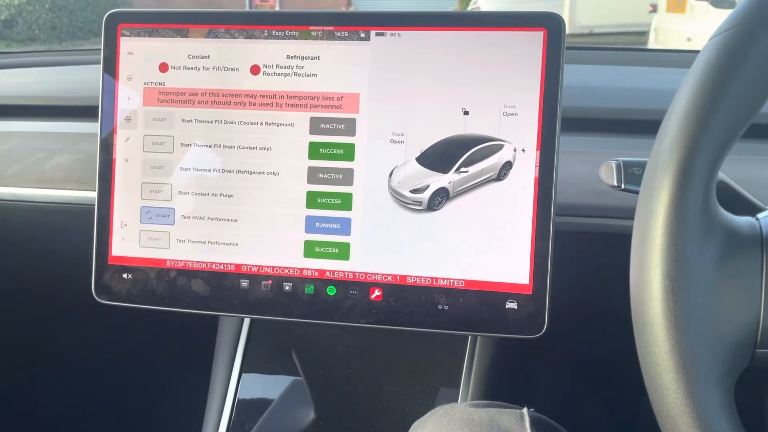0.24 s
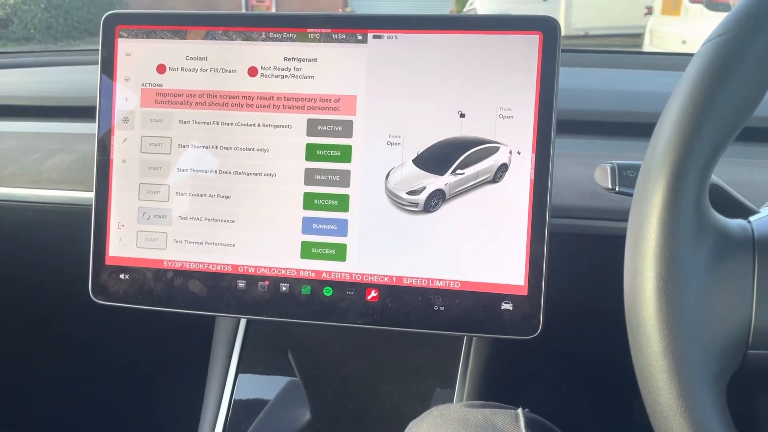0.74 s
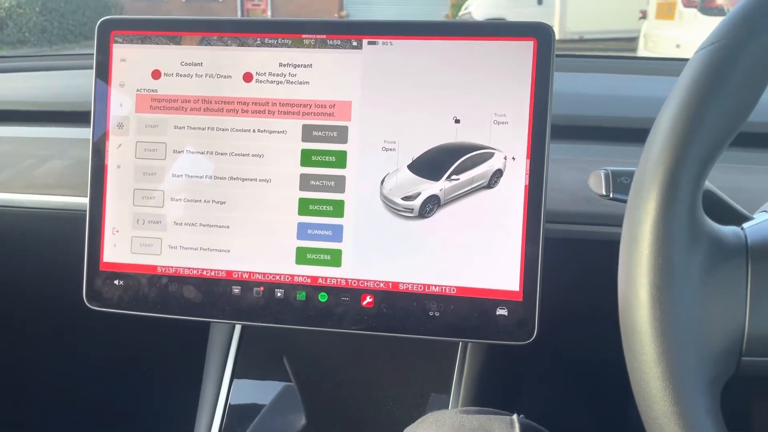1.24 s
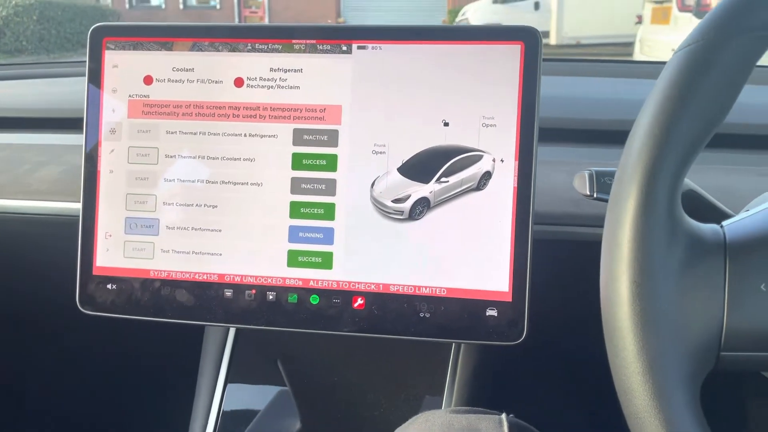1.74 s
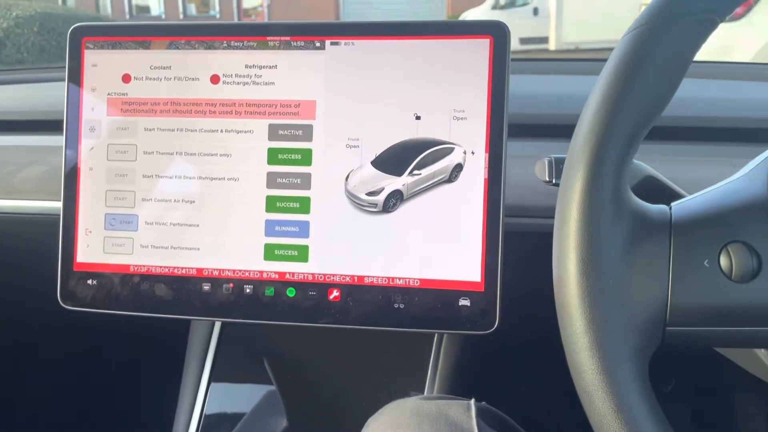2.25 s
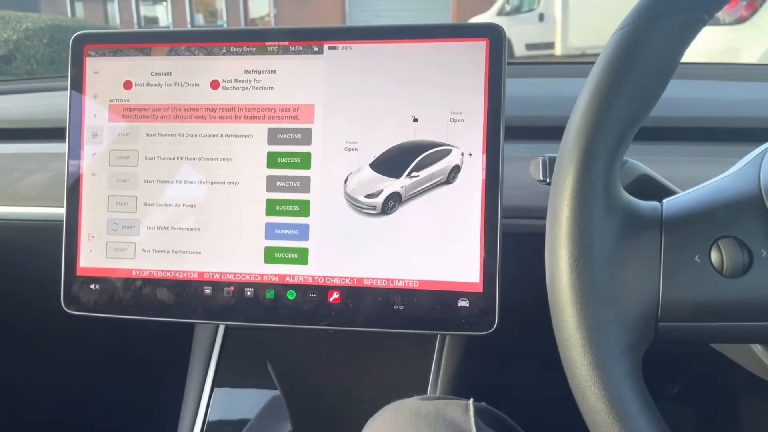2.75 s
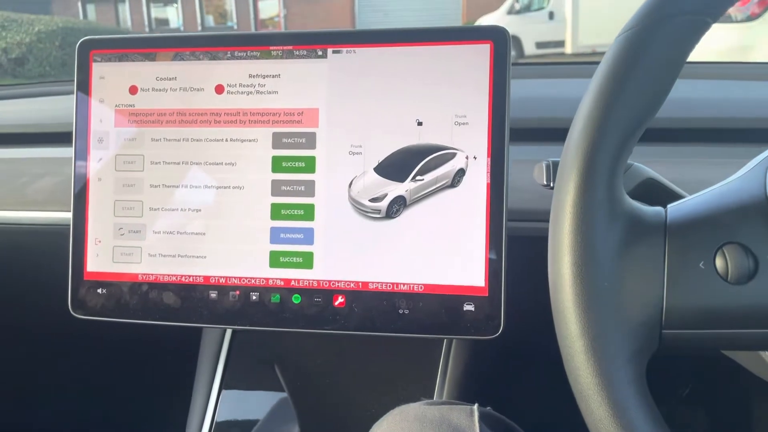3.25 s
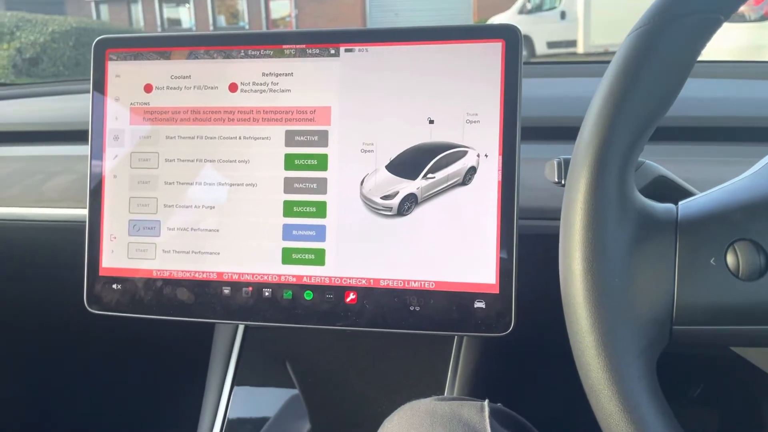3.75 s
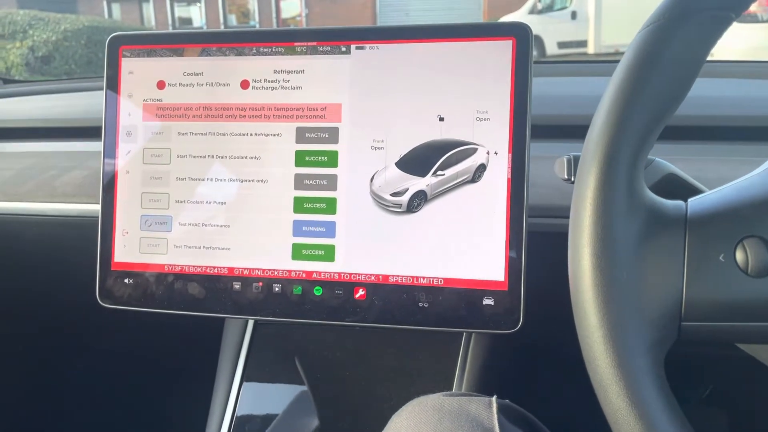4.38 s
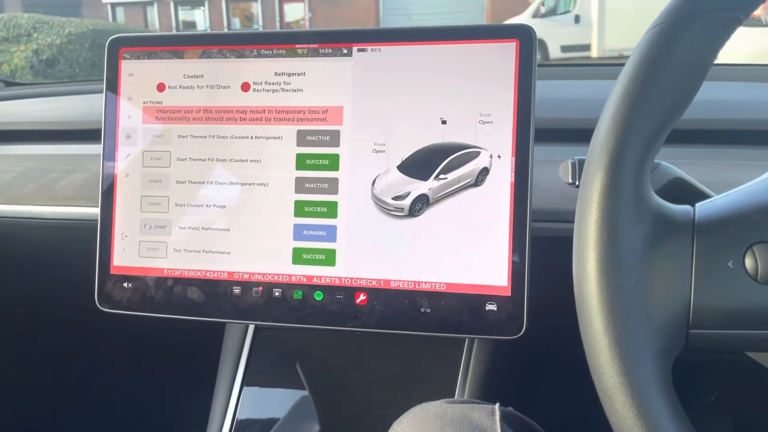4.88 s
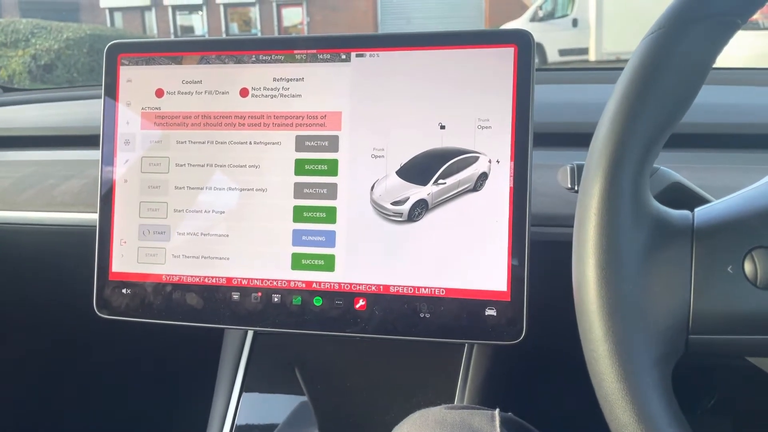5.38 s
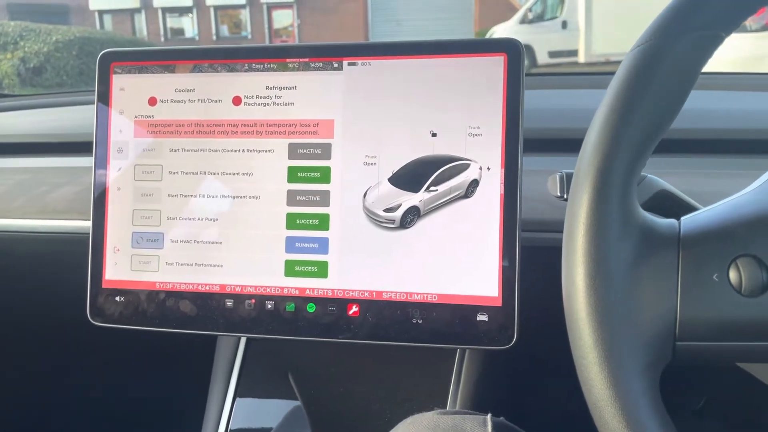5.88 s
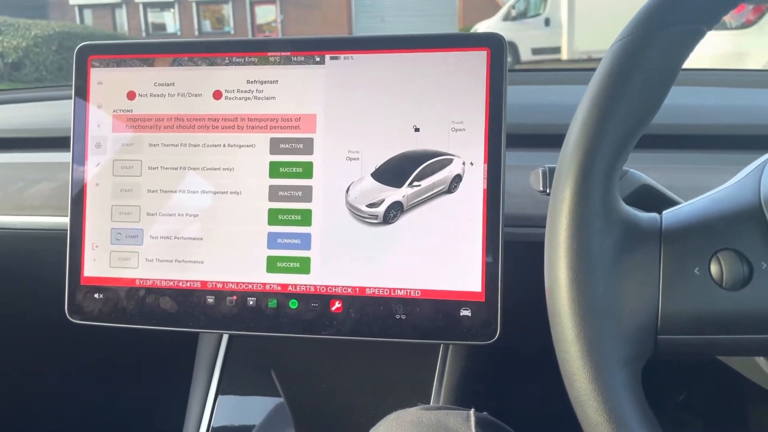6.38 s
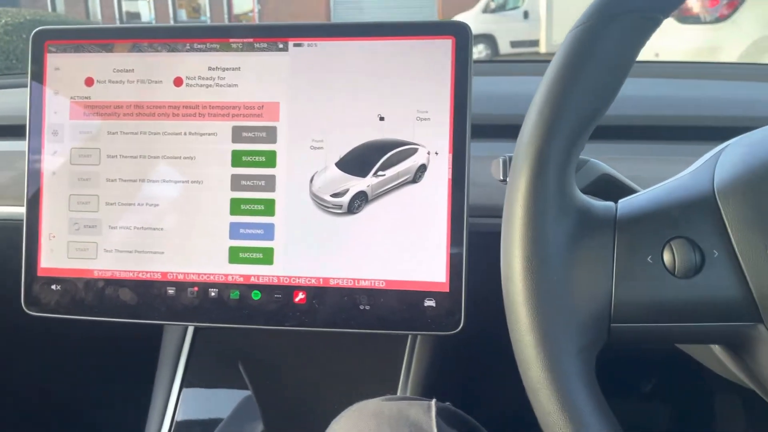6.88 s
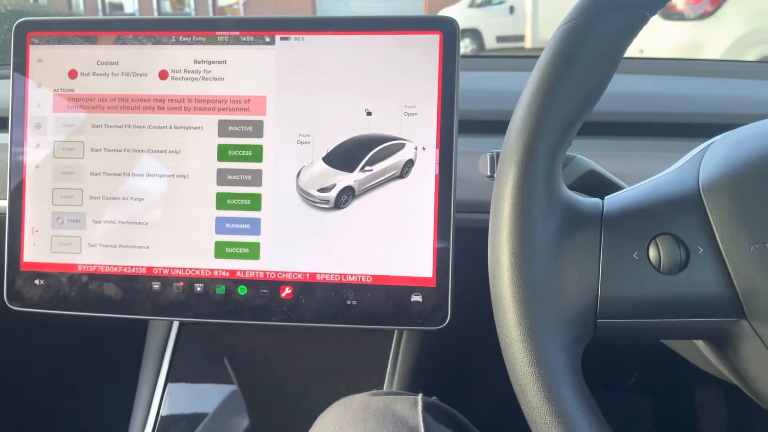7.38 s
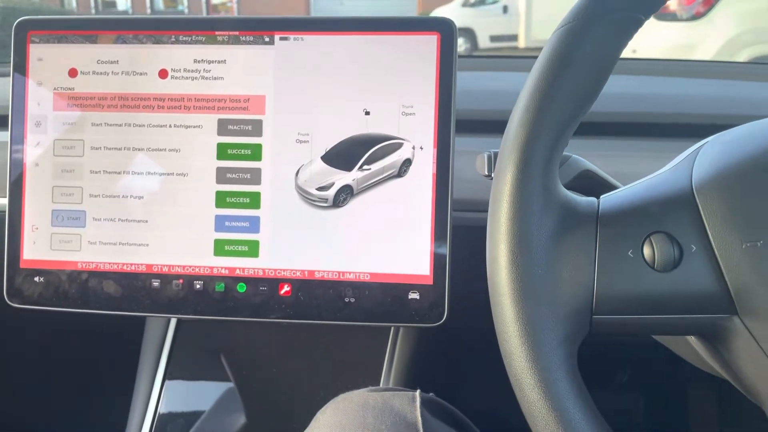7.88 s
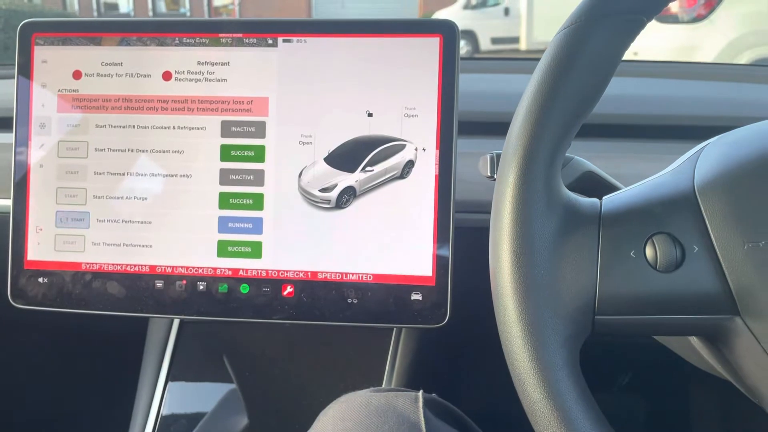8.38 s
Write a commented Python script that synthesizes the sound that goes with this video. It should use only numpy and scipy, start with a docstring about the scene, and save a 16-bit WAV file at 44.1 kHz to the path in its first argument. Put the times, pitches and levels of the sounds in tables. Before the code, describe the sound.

Inside a closed parked car, a climate fan blows steadily through dashboard vents, boomy and hissing, with a low motor whine rising late.

```python
"""In a parked car with the cabin closed, a climate fan blows through the dashboard vents, close to a
handheld pair of microphone ports. The cabin booms, the ducts roar and the vent slats hiss: noise shaped
by spectra and level curves. A fuzzy low hum near 60 Hz, like a cabin resonance, is a sine of random pitch
that swells unevenly; late on a motor, likely the coolant compressor, spins up as a rising tone with an
octave. The right port is muffled for a while."""
import sys
import numpy as np
from scipy import signal
from scipy.io import wavfile
from scipy.ndimage import uniform_filter1d

SR = 44100
rng = np.random.default_rng(int(sys.argv[2]) if len(sys.argv) > 2 else 0)


def store_pcm(level_fs):
    """Save levels as 16-bit WAV."""
    pcm = np.round(np.clip(level_fs, -1, 1) * 32767).astype(np.int16)
    wavfile.write(sys.argv[1], SR, np.atleast_2d(pcm).T)


N = 380583
FRAME, HOP = 4096, 1024  # samples, for shaping noise in the spectrum
FRAMES = N // HOP + 5
BIN_HZ = np.fft.rfftfreq(FRAME, 1 / SR)


def gain_of(db):
    """Decibels to amplitude."""
    return 10 ** (np.asarray(db) / 20)


def evened(x):
    """Scales to rms 1."""
    return x / np.sqrt(np.mean(x ** 2) + 1e-20)


def read(points, hz, axis=1):
    """One column of a table over log frequency."""
    table = np.transpose(points)
    return np.interp(np.log(hz + 1), np.log(table[0] + 1), table[axis])


def curve(rows, axis=1):
    """One column of a table over time, sample by sample."""
    table = np.transpose(rows)
    return np.interp(np.arange(N) / SR, table[0], table[axis])


def smoothed(x, first, second):
    """Averages noise over neighbouring bins, then over neighbouring frames."""
    return uniform_filter1d(uniform_filter1d(x, size=first, axis=0), size=second, axis=1)


def drift(seconds):
    """Slow random wandering, rms 1."""
    size = max(round(seconds * SR), 1)
    wander = uniform_filter1d(rng.standard_normal(N), size=size)
    return evened(uniform_filter1d(wander, size=size))


def compressor():
    """A rough shaft tone and its faint octave, climbing as the motor runs up."""
    # shaft tone of the motor: time_s, pitch_hz, level_db
    spin_up = [(5.4, 83, -46), (5.8, 90, -37), (6.1, 95, -33), (6.35, 99, -29), (6.6, 103, -31.5),
               (6.85, 107, -27), (7.03, 111, -34), (7.2, 114, -29), (7.45, 118, -31), (7.75, 123, -28),
               (8.1, 129.5, -33), (8.23, 132, -29), (8.35, 133.5, -35), (8.63, 136, -31)]
    start_s, waver_hz, octave_db, restless_db = 5.4, 2.2, -15, 2.6
    pitch_hz = curve(spin_up) + waver_hz * drift(0.029)
    phase = 2 * np.pi * np.cumsum(pitch_hz) / SR
    since_s = np.maximum(np.arange(N) / SR - start_s, 0)
    fade_in = np.minimum(10 * since_s, 1)  # over 0.1 s
    tone = np.sqrt(2) * (np.sin(phase) + gain_of(octave_db) * np.sin(2 * phase)) * fade_in
    restless = evened(gain_of(restless_db * drift(0.03)))
    port_db = np.array([[-1.5], [1.5]])  # left, right
    return gain_of(curve(spin_up, axis=2) + port_db) * restless * tone


def hum():
    """A fuzzy low hum near 60 Hz whose pitch wanders at random; it swells and fades."""
    # level of the hum: time_s, level_db
    hum_level = [(0, -41), (.48, -27), (.55, -34), (1.33, -35), (1.42, -26), (1.52, -38), (1.9, -30),
                 (2.04, -38), (2.19, -28), (2.31, -44), (2.4, -26), (2.46, -38), (2.53, -24), (2.63, -38),
                 (2.87, -25), (2.95, -42), (3.3, -34), (3.6, -35), (4.0, -29), (4.4, -32), (4.48, -39),
                 (4.81, -27), (5.2, -33), (5.5, -23), (5.58, -47), (5.77, -28), (5.85, -40), (6.42, -26),
                 (6.66, -39), (6.8, -29), (7.43, -25.5), (7.52, -34), (7.92, -26.5), (8.02, -39),
                 (8.55, -30), (8.63, -38)]
    center_hz, width_hz = 60, 8.32
    swell_s, steady = .05, 2.2  # time scale, and the steady part against a wavering part of rms 1
    wander = uniform_filter1d(uniform_filter1d(rng.standard_normal(N), size=2000), size=2000)
    turns = np.cumsum(center_hz + width_hz / 2 * evened(wander)) / SR
    swell = evened(np.hypot(steady + drift(swell_s), drift(swell_s)))
    tone = np.sqrt(2) * np.sin(2 * np.pi * turns) * swell
    port_db = np.array([[-.2], [.2]])  # left, right
    return gain_of(curve(hum_level) + port_db) * tone


def rings():
    """Lift of the resonances in dB by port, bin and frame, sliding in pitch as the handheld ports drift."""
    # narrow resonances of ducts and cabin: center_hz, width_hz, left_lift_db, right_lift_db
    resonances = [(225, 20, -3, -3), (430, 40, 2, 0), (540, 50, 1, 2.5), (635, 40, 2, 2), (690, 40, -3, 0),
                  (830, 40, 3, 2), (875, 25, -2, 0), (930, 50, 4, 1), (1060, 30, -1, -3), (1110, 40, 5, 3),
                  (1165, 30, -3, -1), (1190, 40, 0, 3), (1300, 50, 0, -3), (1340, 50, 2, 1),
                  (1400, 40, -2, -1.5), (1460, 50, 0, 2.5), (1530, 30, 3, 1), (1800, 90, -3.5, -.5),
                  (2070, 60, 2, 1.5), (2150, 50, 1.5, 1), (2300, 60, 1, 1), (4800, 200, 1.5, 1),
                  (5150, 200, 1.5, 1), (5600, 500, -1, -1), (6350, 300, 1, 1)]
    slide, slide_s = .008, .4  # rms share of pitch, and time scale
    still = np.zeros((2, len(BIN_HZ)))
    for center_hz, width_hz, left_db, right_db in resonances:
        peak = 1 / (1 + (2 * (BIN_HZ - center_hz) / width_hz) ** 2)
        still += np.array([[left_db], [right_db]]) * peak
    frame_at = np.minimum(np.arange(FRAMES) * HOP, N - 1)
    sliding = []
    for port_db in still:
        slid_hz = BIN_HZ[:, None] * (1 + slide * drift(slide_s)[frame_at])
        sliding.append(np.interp(slid_hz, BIN_HZ, port_db))
    return np.array(sliding)


def air(spectrum, rings_db, patchy_db, gusty_db, grainy_db):
    """Noise as both ports hear it, with spectral patches, light gusts and a fine random grain in narrow bands."""
    # the two ports: pitch_hz, likeness (0-1), left_lead_rad, left_minus_right_db
    low_ports = [(60, .945, -.15, -.5), (140, .925, -.1, -3), (210, .95, .2, -4), (350, .95, .2, -2.5),
                 (440, .75, .2, 0), (520, .45, 0, 0), (600, .8, .5, -.5), (760, .62, .8, 0),
                 (900, .55, 1, 2), (1100, .3, 1.6, 1), (1250, .3, 1.6, 1.5), (1450, .12, 0, 1.5),
                 (1650, .2, -1.5, .5), (1850, .45, -.6, 1), (2150, .75, 0, 1), (2400, .75, .45, 1),
                 (2700, .55, .9, 1), (3400, .42, 1.1, 1.5), (4200, .7, .1, 1), (4800, .75, 0, 1),
                 (5250, .55, -.1, 1), (5600, .15, -1.6, 1.5), (6500, .5, -2.6, 1)]
    # treble at the ports, flipping between opposite and equal phase: same columns
    treble_ports = [(6950, 1, -np.pi, 0), (8200, 1, -np.pi, 0), (8450, .75, -4, 0), (9400, .6, -4.9, 0),
                    (10200, 1, -2 * np.pi, 0), (12300, 1, -2 * np.pi, 0), (13100, 1, -3 * np.pi, 0)]
    # muffling of the right port, likely by the hand: time_s, amount (0-1)
    cover_curve = [(0, 0.08), (3.38, 0.11), (3.5, 1), (5.35, 1), (5.55, 0.12), (8.63, 0.15)]
    # what full cover does to the right port: pitch_hz, level_db, likeness_kept (0-1)
    muffle = [(100, -1, 1), (250, 0, 1), (440, -2.5, .85), (600, -3, .7), (680, -6, .7), (760, -9, .3),
              (860, -8, 0), (940, -6.5, 0), (1020, -4, .2), (1200, -4, .6), (1600, -3.5, 1), (2400, -3, 1),
              (3000, -2, 1), (4500, -1, 1), (5400, 0, 1)]
    ports = list(low_ports) + list(treble_ports)

    a, b, c, d, patches, grain = rng.standard_normal((FRAMES, len(BIN_HZ), 6)).T
    grain = evened(smoothed(grain, 4, 2))
    patches = evened(smoothed(patches, 24, 3))
    gusts = evened(uniform_filter1d(rng.standard_normal(FRAMES), size=3))

    cover = np.interp(np.arange(FRAMES) * HOP / SR, *np.transpose(cover_curve))
    kept = 1 - cover * (1 - read(muffle, BIN_HZ, axis=2)[:, None])
    likeness = np.clip(read(ports, BIN_HZ)[:, None] * kept, 0, 1)
    lead = np.exp(1j * read(ports, BIN_HZ, axis=2))[:, None]
    lean_db = read(ports, BIN_HZ, axis=3) / 2 * np.array([[1], [-1]])

    # the left port shares part of the right port's noise and adds its own
    right = a + 1j * b
    left = lead * (likeness * right + np.sqrt(1 - likeness ** 2) * (c + 1j * d))
    bins = np.array([left, right]) * gain_of(lean_db[:, :, None] + rings_db)
    bins[1] *= gain_of(read(muffle, BIN_HZ)[:, None] * cover)

    # above its last row the spectrum falls away to silence
    closed = list(spectrum) + [(4 * spectrum[-1][0], -120)]
    uneven_db = patchy_db * patches + gusty_db * gusts + grainy_db * grain
    bins *= gain_of(read(closed, BIN_HZ)[:, None] + uneven_db)
    noise = signal.istft(bins, nperseg=FRAME, noverlap=FRAME - HOP)[1]
    return evened(noise[:, :N])


def vents():
    """Rumble and boom follow the cabin lows; hollow note, roar and hiss follow the air stream."""
    # spectra before resonances and ports, each with columns: pitch_hz, relative_density_db (per Hz)
    # deepest rumble of the closed cabin
    rumble_spectrum = [(20, -29), (40, 7.5), (58, 5.5), (70, 11.5), (88, 4), (122, 7), (145, -9.5),
                       (200, -55)]
    # low rush of air in the cabin
    boom_spectrum = [(80, -11), (130, 0.5), (160, -0.5), (190, 2.5), (220, -5.5), (245, 1.5), (280, 0),
                     (330, -4), (430, -8), (520, -19), (800, -48)]
    # wide hollow band of the main duct
    hollow_spectrum = [(330, -27), (470, -4.5), (570, -2.5), (630, 2), (700, 3.5), (840, 1), (950, 0.5),
                       (1060, 0), (1400, -49)]
    # turbulence in the ducts
    roar_spectrum = [(600, -67), (1000, -36), (1150, 0.5), (1290, -2.5), (1600, -1.5), (1800, -2),
                     (2100, -3.5), (2450, -4.5), (2700, -10), (3300, -20.5), (4500, -59)]
    # jets through the vent slats
    hiss_spectrum = [(1500, -30), (2400, -4), (3000, 0), (4000, -6), (5000, -8), (6500, -11.5),
                     (8500, -14.5), (10000, -20.5), (12000, -27.5), (12900, -35), (14000, -33),
                     (15200, -30.5), (16500, -32)]
    # air stream, building up, holding and easing near the end: time_s, ducts_db, slats_db, hollow_db
    stream = [(0, -4, -6, -3.5), (.4, -1.5, -3.5, -1), (1.0, -.5, -2, -0.5), (2.2, 0, -1, 0),
              (3.0, -1.4, -0.5, -1.5), (3.4, -1.7, -1, 0), (3.55, -1.5, -1, -2), (5.2, -1, -1.5, -1.5),
              (5.7, -1, -1, -1.5), (6.3, -1.5, -1, -1), (6.75, -1.5, -0.8, -0.5), (7.0, -3.5, -3, -2.5),
              (7.5, -3, -2.2, -2.5), (8.0, -4, -3.5, -4), (8.63, -4.5, -3.5, -4.5)]
    # uneven low end in the cabin: time_s, rumble_db, rush_db
    lows = [(0, -3, -4.5), (.5, -1.5, -1), (1.4, -1, -1), (2.5, -2, 1), (3.2, 0.5, -0.5), (3.7, -0.3, 1.5),
            (4.0, 1.5, 0.5), (4.4, 0.5, 1), (5.0, -2, 1.5), (5.3, 3, 1.5), (5.6, -0.5, 0.5), (6.3, 3, 1),
            (6.95, 1, 1), (7.2, 0, -.5), (7.9, -0.8, 0), (8.25, 1, 0.5), (8.63, 1, -2.5)]

    lift_db = rings()
    # level in dB where the curve is 0; rumble and boom follow their curves by a factor
    rumble_db = -27 + 1.26 * curve(lows)
    boom_db = -28 + 0.84 * curve(lows, axis=2)
    hollow_db = -34 + curve(stream, axis=3)
    roar_db = -35 + curve(stream)
    hiss_db = -40 + curve(stream, axis=2)

    rumble = air(rumble_spectrum, lift_db, patchy_db=0.8, gusty_db=1.4, grainy_db=0.1)
    boom = air(boom_spectrum, lift_db, patchy_db=0.5, gusty_db=0.47, grainy_db=1.03)
    hollow = air(hollow_spectrum, lift_db, patchy_db=0.8, gusty_db=0.3, grainy_db=0.8)
    roar = air(roar_spectrum, lift_db, patchy_db=0.58, gusty_db=-0.06, grainy_db=2.0)
    hiss = air(hiss_spectrum, lift_db, patchy_db=0.7, gusty_db=-0.07, grainy_db=3.0)

    lows_mix = gain_of(rumble_db) * rumble + gain_of(boom_db) * boom
    stream_mix = gain_of(hollow_db) * hollow + gain_of(roar_db) * roar + gain_of(hiss_db) * hiss
    return lows_mix + stream_mix


def scene():
    """Air stream, low hum and rising motor tone."""
    return vents() + hum() + compressor()


def record(dry):
    """The microphones lose the deepest bass; then the treble is cut at the band limit."""
    low_cut_hz, edge_hz = 42.7, 15750
    high_pass = signal.butter(3, low_cut_hz, "high", fs=SR, output="sos")
    thin = signal.sosfilt(high_pass, dry)
    band_limit = signal.firwin(511, edge_hz, window=("kaiser", 9), fs=SR)
    return signal.oaconvolve(thin, band_limit[None], "same", axes=1)


dry = scene()
out = record(dry)
store_pcm(out)
```